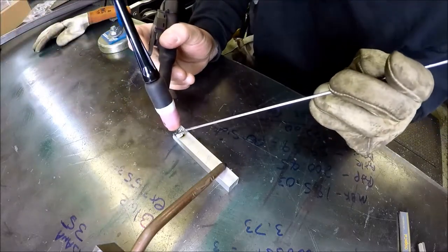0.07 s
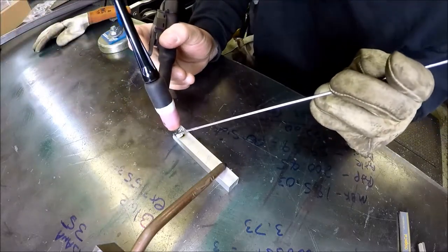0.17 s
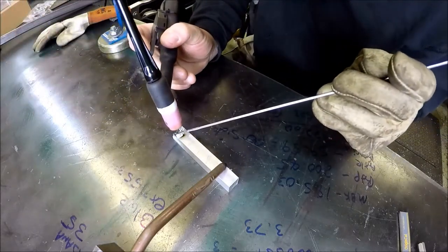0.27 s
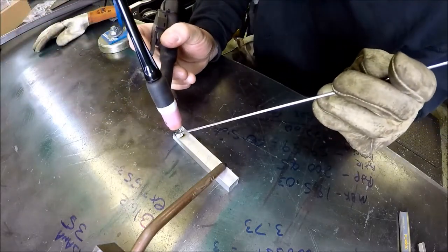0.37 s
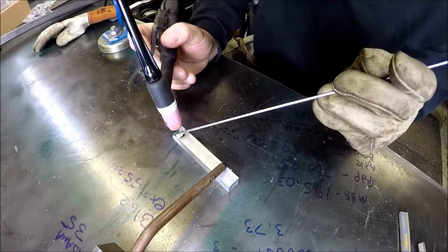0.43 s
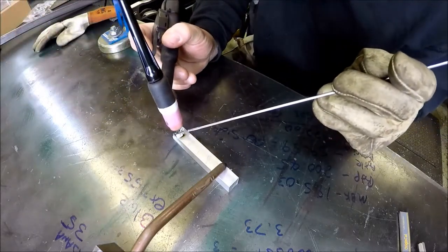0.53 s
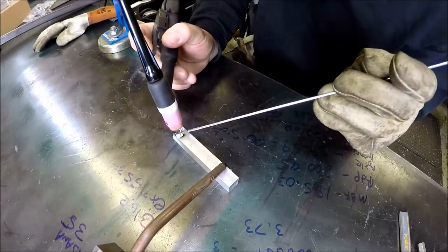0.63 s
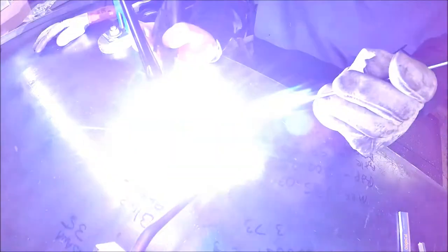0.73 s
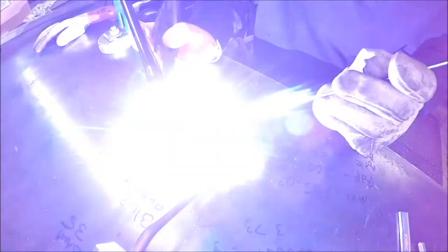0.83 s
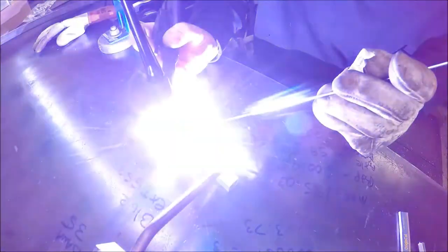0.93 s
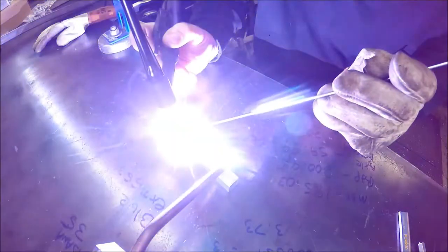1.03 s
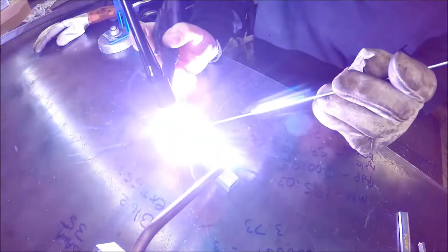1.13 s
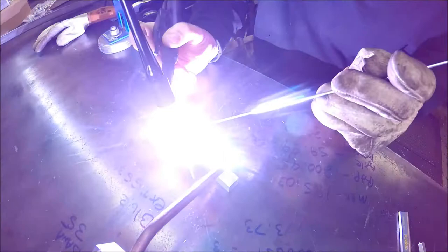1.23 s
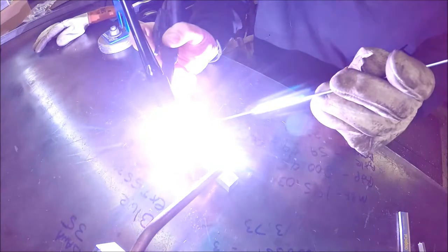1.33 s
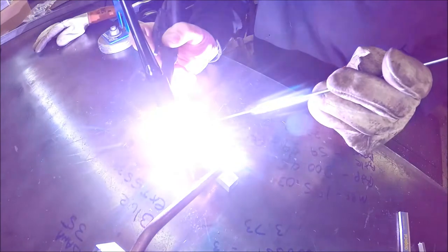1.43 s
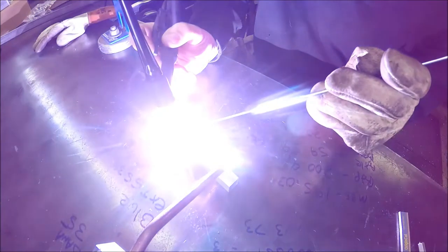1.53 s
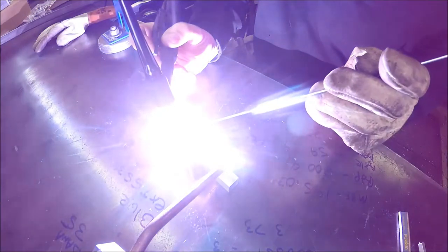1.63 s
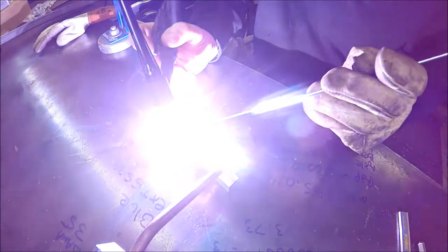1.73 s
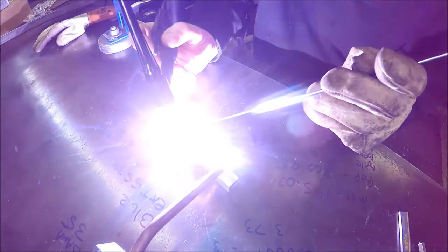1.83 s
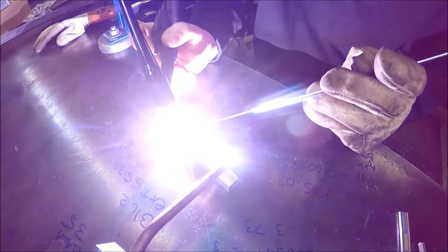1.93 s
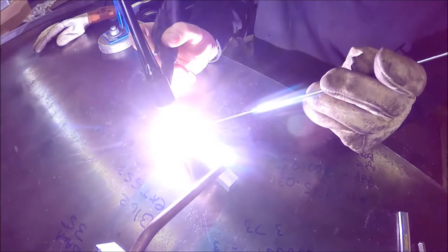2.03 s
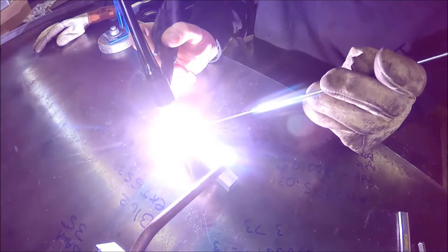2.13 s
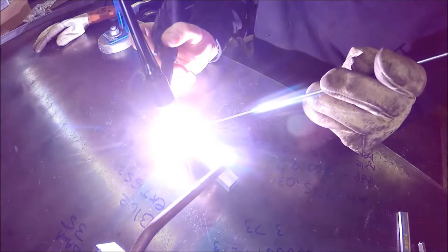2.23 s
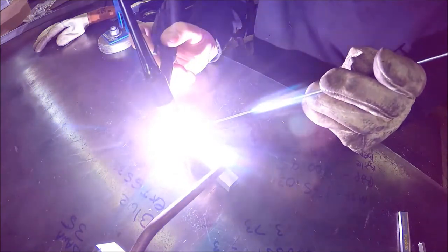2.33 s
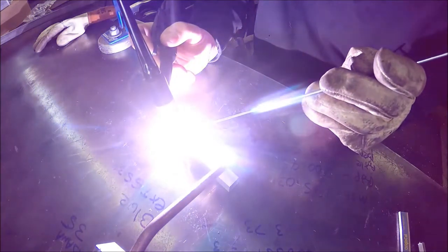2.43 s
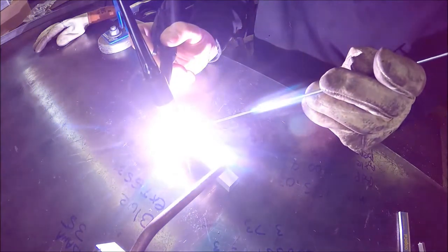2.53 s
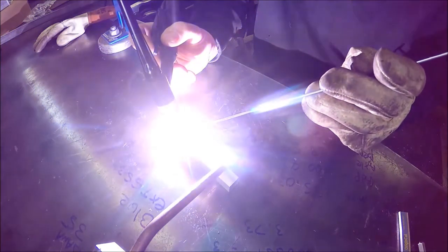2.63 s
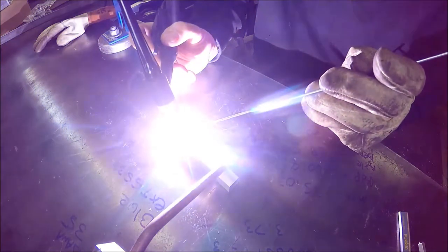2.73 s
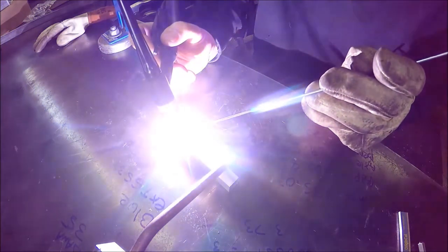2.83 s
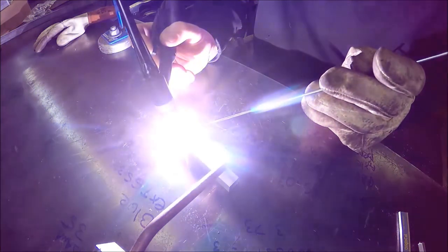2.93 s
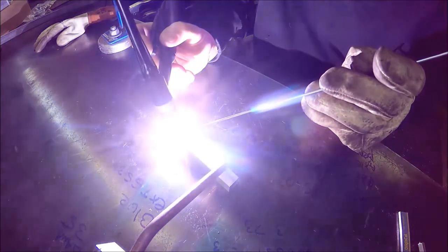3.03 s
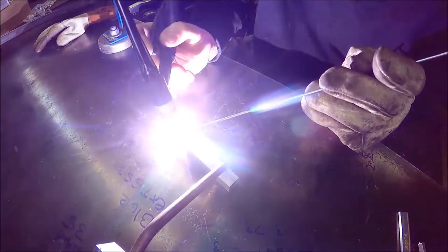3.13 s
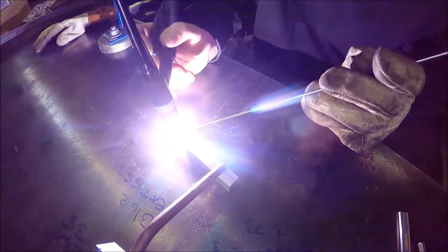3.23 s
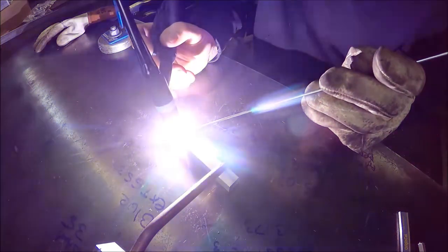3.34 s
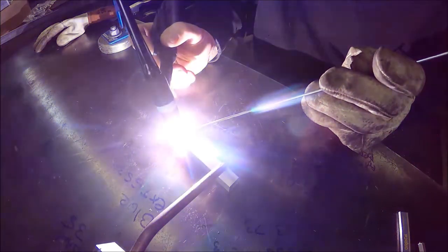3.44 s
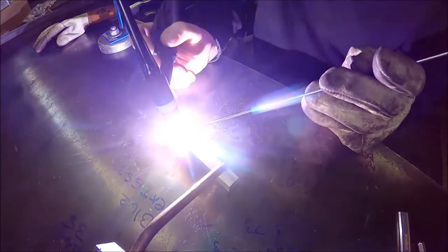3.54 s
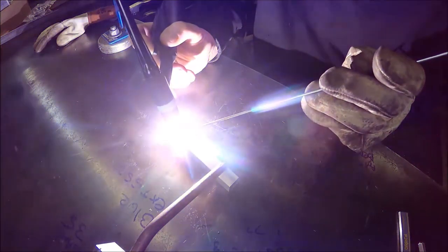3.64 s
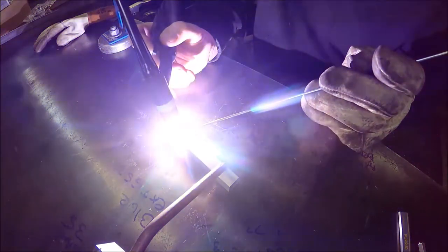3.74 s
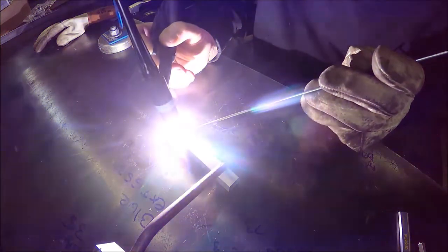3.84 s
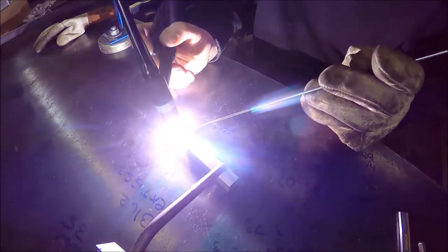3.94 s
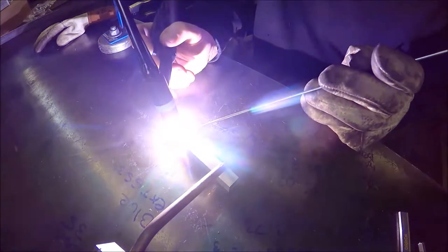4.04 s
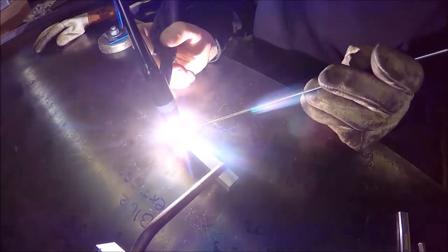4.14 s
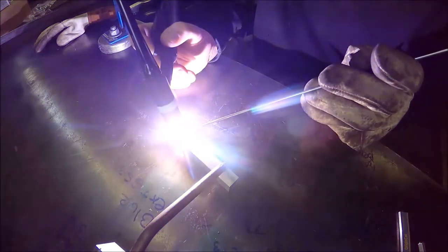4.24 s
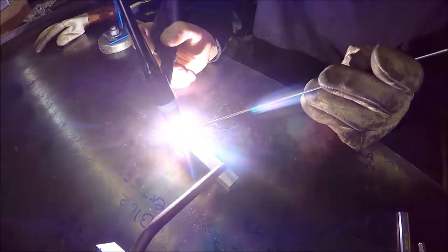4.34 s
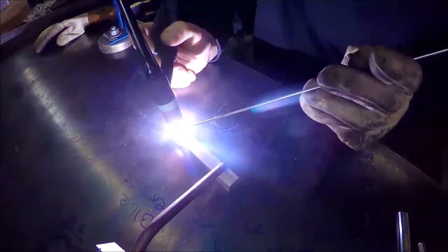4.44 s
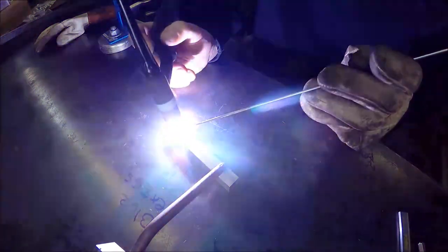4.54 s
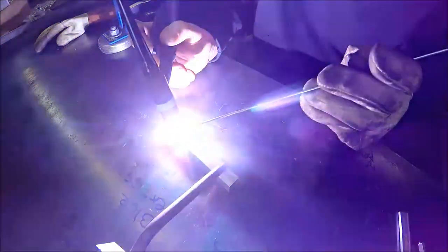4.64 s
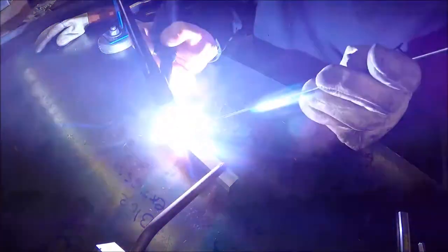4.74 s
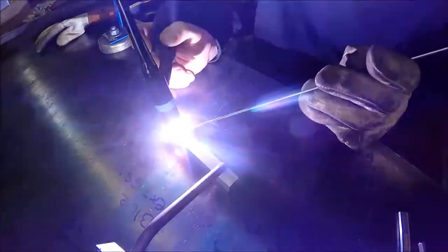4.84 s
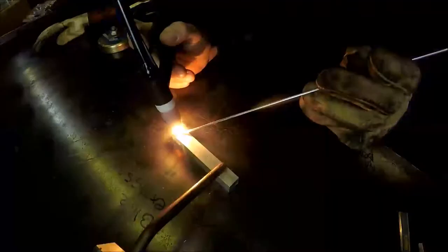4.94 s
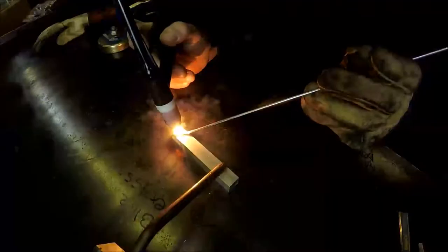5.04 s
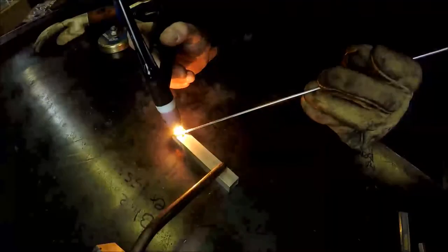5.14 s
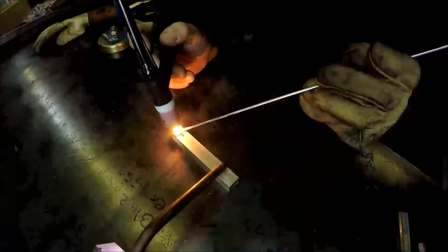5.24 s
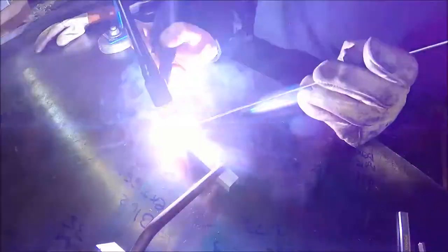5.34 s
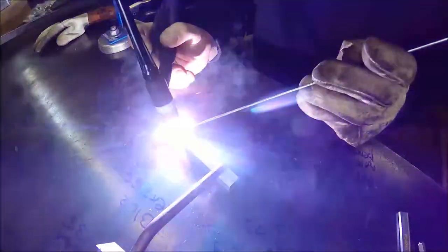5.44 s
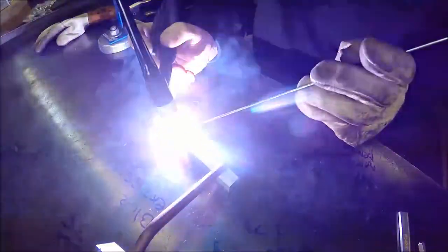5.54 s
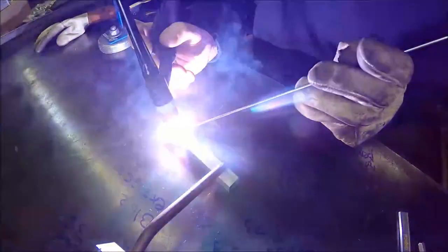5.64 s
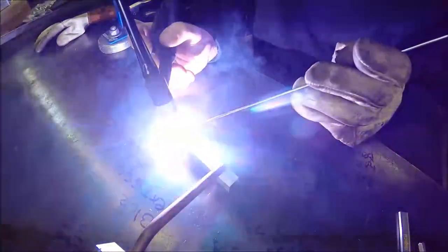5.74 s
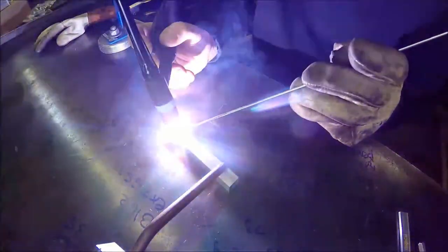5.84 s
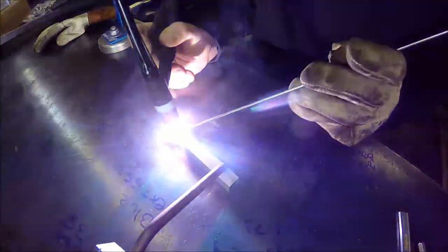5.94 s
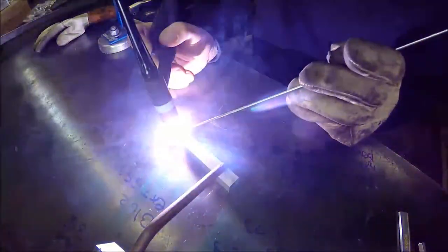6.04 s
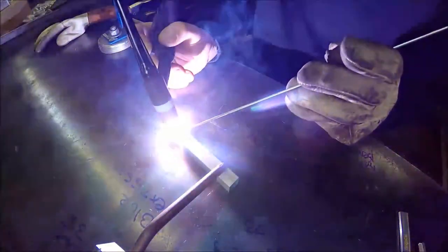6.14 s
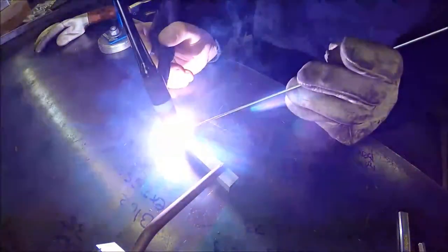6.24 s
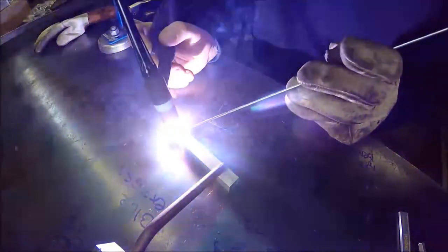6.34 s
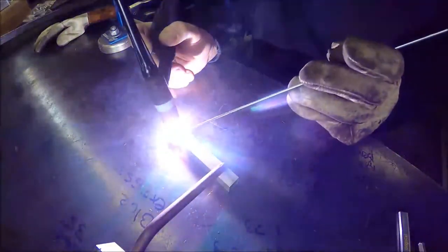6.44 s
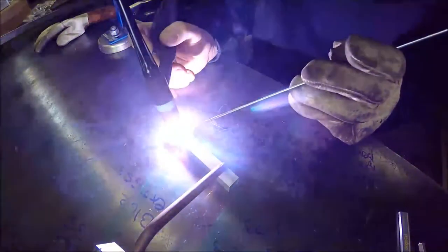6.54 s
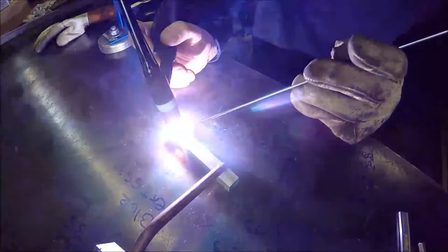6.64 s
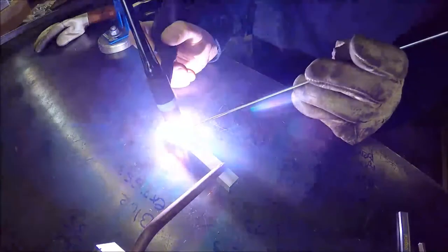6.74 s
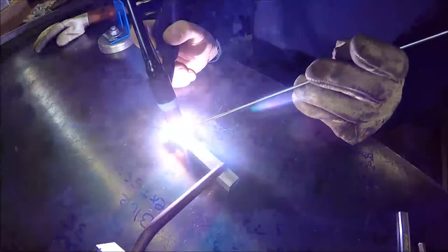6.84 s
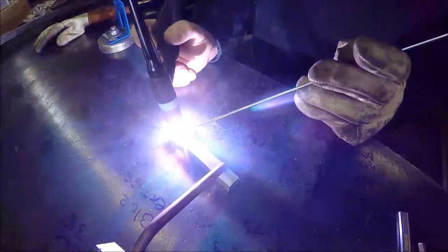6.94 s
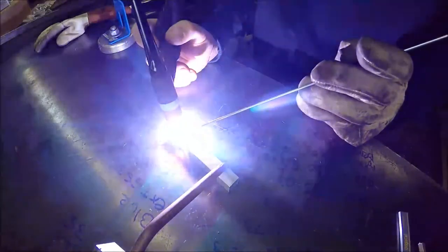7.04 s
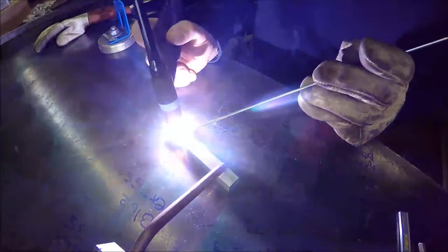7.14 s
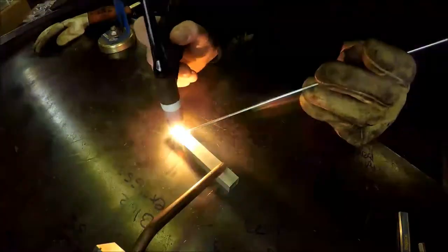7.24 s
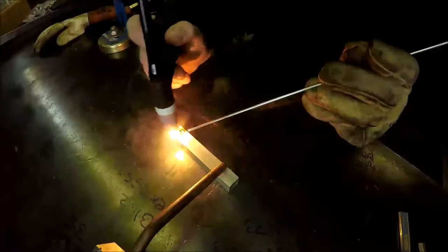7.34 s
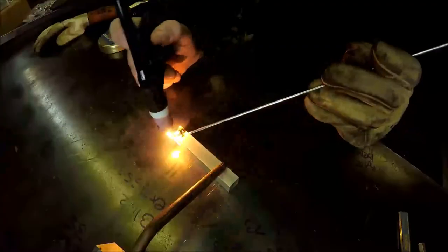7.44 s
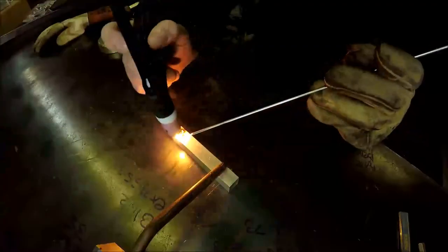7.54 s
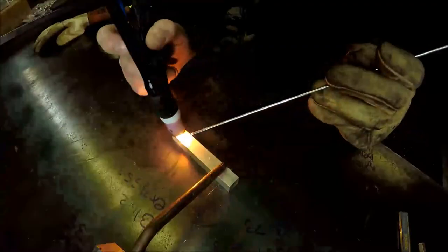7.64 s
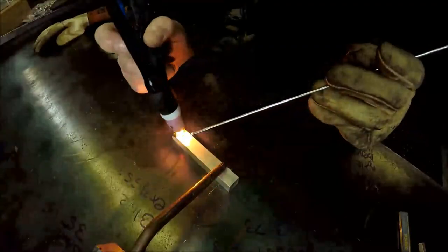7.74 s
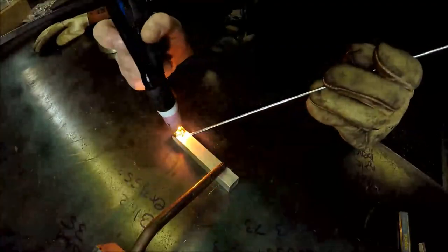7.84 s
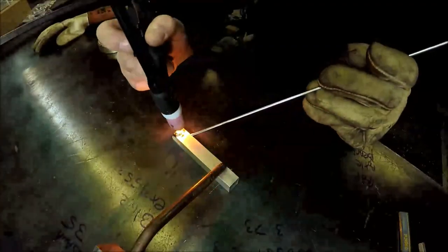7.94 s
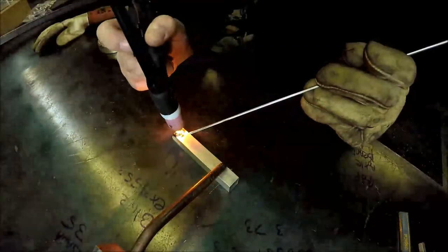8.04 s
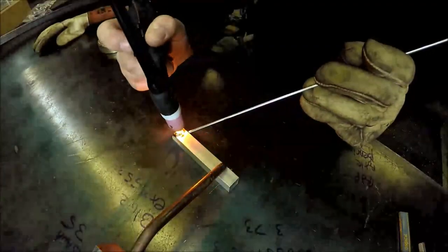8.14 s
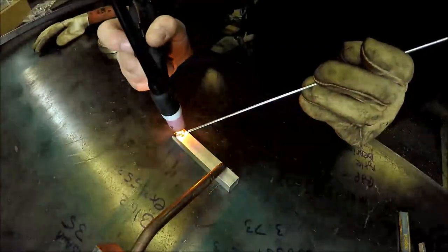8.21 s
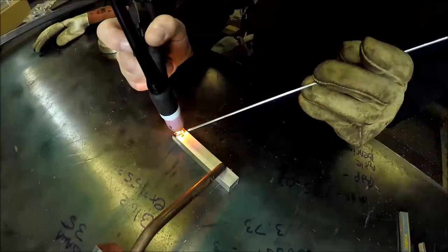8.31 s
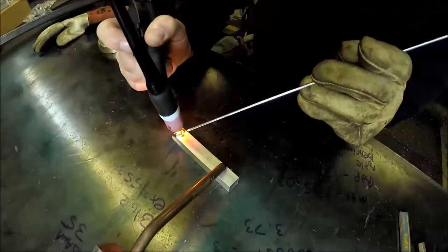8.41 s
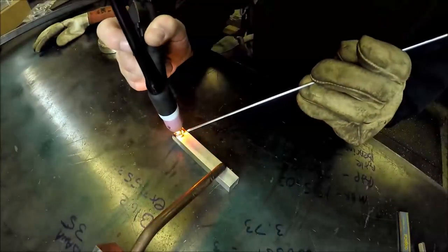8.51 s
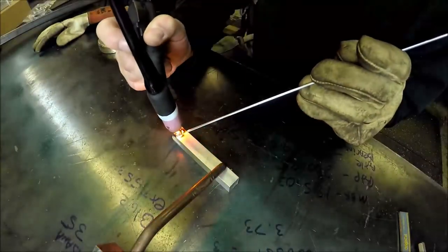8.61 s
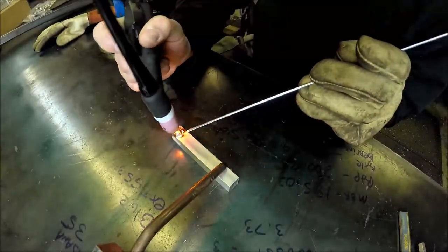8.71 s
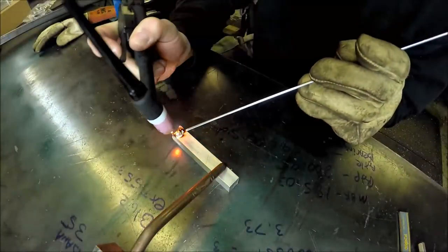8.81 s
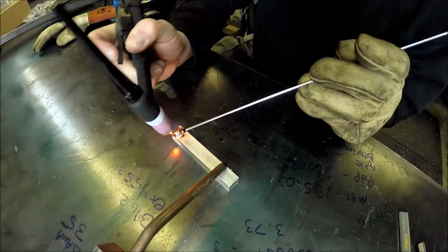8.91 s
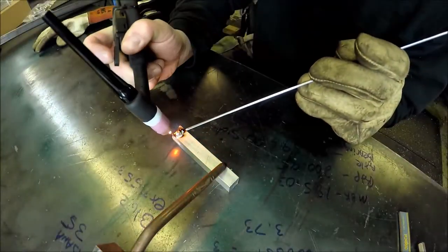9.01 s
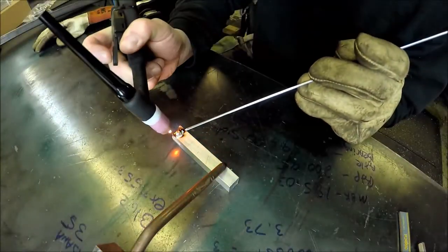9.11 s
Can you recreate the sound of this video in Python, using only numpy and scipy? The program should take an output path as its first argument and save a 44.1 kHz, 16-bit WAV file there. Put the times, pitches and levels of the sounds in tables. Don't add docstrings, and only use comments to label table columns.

```python
import sys
import numpy as np
from scipy import signal
from scipy.fft import rfft, irfft
from scipy.io import wavfile
from scipy.ndimage import uniform_filter1d

SR = 44100
rng = np.random.default_rng(int(sys.argv[2]) if len(sys.argv) > 2 else 0)


def magnitude_from_level(level_db):
    exponent = np.asarray(level_db, float) / 20
    return 10 ** exponent


def unload_wav(signal):
    wavfile.write(
        sys.argv[1],
        SR,
        np.round(np.clip(np.atleast_2d(signal).T, -1, 1) * 32767).astype(np.int16),
    )


N = 404397

# first reversal in seconds, end in seconds, current cycles per second.
BURNS = [
    (.81676, 5.04, 32.01042),
    (5.41011, 7.33, 32.01137),
]
POSITIVE_S = .01105


def evened(x):
    return x / np.sqrt(np.mean(x ** 2) + 1e-20)


def read(points, hz):
    f, value = np.transpose(points)
    return np.interp(np.log(hz + 1), np.log(f + 1), value)


def noise(points, treble_db=0., patchy_db=3.0, dip_hz=0., dip_db=0.):
    frames, hz = N // 128 + 5, np.fft.rfftfreq(512, 1 / SR)[:, None]
    a, b, patches = rng.standard_normal((frames, 257, 3)).T
    patches = uniform_filter1d(patches, size=4, axis=0)
    patches = evened(uniform_filter1d(patches, size=70, axis=1))
    frame_at = np.arange(frames) * 128
    treble, dip = (np.interp(frame_at, np.arange(N), c * np.ones(N)) for c in (treble_db, dip_hz))
    field_db = read(points, hz) + patchy_db * patches
    field_db += np.clip((hz - 8500) / 3500, 0, 1) * treble
    for share, depth in ((1, 1), (1.16, .6), (.81, .5)):
        field_db += depth * dip_db * np.exp(-.5 * ((hz - share * dip) / 400) ** 2)
    spectra = (a + 1j * b) * magnitude_from_level(field_db) * (hz < 15300)
    return evened(signal.istft(spectra, nperseg=512, noverlap=384)[1][:N])


def fan():
    # pitch in Hz, level in dB per Hz.
    air_colour = [(15, -46), (25, -14), (232, -5.5), (329, -8), (387, -11), (563, -13.5), (756, -11),
                  (1940, -16), (2530, -22), (4110, -25.5), (15300, -58)]
    # pitch in Hz, level in dB.
    hum = [(118.4, -54), (238, -54), (382.2, -48), (769.8, -60), (1152, -60), (1534, -65), (1916, -57)]
    t = np.arange(N) / SR
    hz = np.linspace(0, SR / 2, 2049)
    taps = signal.firwin2(4097, hz, magnitude_from_level(read(air_colour, hz)), fs=SR)
    air = signal.oaconvolve(rng.standard_normal(N), taps, "same")
    waver = evened(uniform_filter1d(rng.standard_normal((len(hum), N)), size=6000, axis=1))
    lines = np.zeros(N)
    for (pitch, db), w in zip(hum, waver):
        lines += magnitude_from_level(db + 4 + 1.6 * w) * np.sin(2 * np.pi * (pitch * t + w / 30))
    return magnitude_from_level(-41.5) * evened(air) + lines


def gas():
    # pitch in Hz, level in dB per Hz.
    gas_colour = [(760, -50), (1300, -16), (1670, -0.5), (2680, -7), (3390, -6), (4090, -10), (5860, -4.5),
                  (6500, 0.5), (8950, -9.5), (9720, -5.5), (11100, -15), (11600, -17), (13400, -11),
                  (15300, -16)]
    # time in seconds, hiss in dB, treble in dB as the cup turns, bench echo dip in Hz.
    flow = [(.755, -66, 2, 9300), (.77, -34, 0, 9000), (5.05, -45.5, 0, 11300), (5.35, -38.5, -1, 11300),
            (7.35, -50, -2, 10500), (7.45, -41.5, 3, 9000), (7.6, -41, 3, 9500), (7.7, -40.5, 7, 12500),
            (7.82, -39.5, 0, 11500), (7.9, -40, 5, 8750), (8.0, -39.5, 1, 8700), (8.07, -39.5, 2, 11400),
            (8.5, -39, 0, 11600), (8.8, -40, 2, 11400), (9.0, -40.5, 8, 11200), (9.17, -40.5, 5, 11100)]
    # time in seconds, peak in dB, pitch in Hz.
    valve = [
        (.62, -34, 9000),
        (.777, -34, 163),
    ]
    t = np.arange(N) / SR
    at, *curves = np.transpose(flow)
    flow_db, treble_db, dip_hz = (np.interp(t, at, c) for c in curves)
    out = magnitude_from_level(flow_db) * noise(gas_colour, treble_db, patchy_db=1.3, dip_hz=dip_hz, dip_db=-7.)
    (tick_s, tick_db, tick_hz), (puff_s, puff_db, puff_hz) = valve
    hiss = signal.lfilter(*signal.butter(1, tick_hz, "high", fs=SR), rng.standard_normal(N))
    out += magnitude_from_level(tick_db) * hiss * np.exp(-.5 * ((t - tick_s) / 0.0009) ** 2)
    puff = np.sin(2 * np.pi * puff_hz * t) * np.exp(-.5 * ((t - puff_s) / 0.0061) ** 2)
    return out + magnitude_from_level(puff_db) * puff


def controls(s):
    # time in seconds, current in dB, pool size in dB, arc length in dB.
    pedal = [(.83, -1, -0.5, 4), (.95, 2, -1.5, 6), (1.15, -3.5, -7, 1), (1.4, -0.5, -0.5, 1.5),
             (1.9, 0.5, 1, 3), (2.6, 1, 2, 3), (3.299, 1.5, 2, 1), (3.9, 1.5, 0, 2), (4.3, -1, -2, -0.5),
             (4.72, -1, -0.5, -1.5), (5.0, -4, -6.5, 1), (5.42, 0.5, -1.5, 0.5), (5.7, -5.5, -5.5, 3),
             (5.85, -4.5, -8.5, -4), (6.1, -3.5, -4.5, -0.5), (6.5, -1, -3, 3), (7.02, -2.5, -1.5, -1),
             (7.3, -3, -3.5, 1.5)]
    # time in seconds, spread in seconds, flare in dB.
    flares = [
        (.92, 0.064, 3),
        (4.56, 0.047, 5.5),
        (4.7, .07, 6),
        (5.42, 0.026, 2),
        (5.6, .012, 5.5),
        (5.69, 0.043, 7),
        (6.5, 0.12, 1.5),
        (7.28, 0.05, 3.5),
    ]
    at, current, pool, length = np.transpose(pedal)
    flare = np.max([db * np.exp(-.5 * ((s - mid) / spread) ** 4) for mid, spread, db in flares], axis=0)
    return np.array([np.interp(s, at, current), np.interp(s, at, pool), flare, np.interp(s, at, length)])


def arc_treble(s):
    return -5 - 0.4 * s


def push(s):
    current, pool, flare, length = controls(s)
    fed = s > 4.45
    calm_db = 1.2 * np.minimum(pool, 0) * (s < 4.45)
    return -16.5 + 7.5 * fed + calm_db + 0.21 * flare


def reversals():
    # time in seconds, snap in dB, thump in dB, knock in dB.
    strays = [
        (0.7891, -17, -20, -20),
        (0.8012, -19, -13.5, -9),
        (4.4959, -9, -17, -15),
        (4.5093, -14, -22, -22),
        (4.5682, -38, -19, -20),
        (5.039, -35.7, -23, -25),
        (5.3725, -21, -19, -18),
        (5.3902, -14.5, -21, -11.5),
        (5.606, -28.5, -25, -25),
        (5.6975, -30, -41, -25),
    ]
    # dB at full current, then dB per dB of current,
    # of pool, of flare and of arc length.
    to_plus = [(-16, 0, 0.036, 0.094, 0.63), (-21.5, -0.35, 0.81, .9, .1), (-26, -0.5, 1.2, 0.99, 0)]
    to_minus = [(-16.5, 0.64, 0, 0.041, .2), (-23, 1.7, 0.11, 0.62, 0), (-14.5, 0.98, 0.013, 0.45, 0)]
    t = np.arange(N) / SR
    rows, gates = [(*row, 0) for row in strays], np.zeros((2, N))
    for start, end, rate in BURNS:
        for law, late, positive in ((to_plus, 0, 1), (to_minus, POSITIVE_S, 0)):
            at, law = np.arange(start + late, end, 1 / rate), np.array(law)
            levels_db = law[:, :1] + law[:, 1:] @ controls(at)
            rows += list(zip(at, *levels_db, positive + 0 * at))
        burning = (t > start - .028) & (t < end)
        gates += [burning & ((t - start) * rate % 1 < POSITIVE_S * rate), burning]
    return np.array(rows), gates


def burst(hz, centre_s, spread_s):
    t = np.arange(1024) / SR - centre_s
    x = np.cos(2 * np.pi * hz * t) * np.exp(-.5 * (t / spread_s) ** 2)
    return rfft(x / np.linalg.norm(x, axis=-1, keepdims=True)) * np.sqrt(.003 * SR)


def snap_colour(hz):
    # pitch in Hz, level in dB.
    snap_points = [(1700, -42.5), (2350, 4), (3000, -9), (4600, -9), (5550, -4), (5850, 1), (7500, 4.5),
                   (8800, -2), (10200, 4), (11300, -6.5), (12700, -5.5), (14200, -3.5), (15300, -7),
                   (16500, -30)]
    # delay in seconds, level in dB.
    echoes = [(.00034, -13), (.00082, -15), (.00143, -16), (.00197, -16), (.0024, -22)]
    snap_db = read(snap_points, hz)
    log_gain = np.log(magnitude_from_level(np.r_[snap_db, snap_db[-2:0:-1]]))
    snap = 1j * np.exp(np.conj(signal.hilbert(log_gain)))[:len(hz)]
    scatter = 1
    for k, (s, db) in enumerate(echoes):
        scatter = scatter + (-1) ** k * magnitude_from_level(db) * np.exp(-2j * np.pi * hz * s)
    snap *= scatter
    return snap * np.sqrt(.003 * SR / np.mean(abs(snap) ** 2))


def cracks(rows):
    # pitch in Hz, level in dB.
    ringing = [(2593, -33), (2960, -25.5), (3470, -37.5), (5790, -36)]
    hz, t, lead = np.fft.rfftfreq(1024, 1 / SR), np.arange(1024) / SR, 128 / SR
    s, db, positive = rows[:, 0], rows[:, 1:4], rows[:, 4:]
    chance = rng.standard_normal((len(rows), 7))
    vary_db = (.25 + .55 * positive) * chance[:, :3] * [.8, 1.2, 1.1]
    size = magnitude_from_level(db + np.array([-1., -1.2, -.8]) + vary_db)
    snap_size, thump_size, knock_size = size.T[:, :, None]
    treble_db = arc_treble(s)[:, None] + 6
    unrest = thump_size * magnitude_from_level(push(s))[:, None]
    spit = rng.standard_normal((len(rows), 1024)) * np.exp(-t / .0002)
    spit = rfft(spit / np.linalg.norm(spit, axis=1, keepdims=True))
    snap = snap_colour(hz) * (.97 + .18 * spit)
    held = np.clip(t / 0.0023, 0, 1) * np.clip((.0095 - t) / 0.000079, 0, 1)
    whine = rfft(held * sum(magnitude_from_level(level) * np.sin(2 * np.pi * f * t) for f, level in ringing))
    z = snap * magnitude_from_level(treble_db * np.clip((hz - 10500) / 1000, 0, 1))
    z = z + (2 * positive - 1) * whine * magnitude_from_level(11)
    z *= snap_size * np.exp(-2j * np.pi * hz * (lead - .0001))
    z -= thump_size * burst(704, lead + 0.00033 + 0.00018 * positive, 0.00073)
    z += unrest * burst(258, lead + 0.002, 0.0012)
    z -= thump_size * magnitude_from_level(-10.0) * burst(619, lead + 0.005236 + 0.000072 * positive, 0.0025)
    z -= thump_size * magnitude_from_level(-14.0) * burst(470, lead + 0.00441, 0.0027)
    z += knock_size * magnitude_from_level(-10.0) * burst(2162, lead + 0.00052, 0.0016)
    z += knock_size * magnitude_from_level(-17.0) * burst(1720, lead + 0.0076, 0.0056)
    z += knock_size * (1 - 2 * positive) * burst(1754, lead + .0001 + 0.00045 * positive, 0.00064)
    pop_hz = 2100 * np.exp(0.26 * chance[:, 4:5])
    pop = burst(pop_hz, lead + 0.000637 + 0.00022 * chance[:, 5:6], 0.00017)
    z += magnitude_from_level(-1.) * unrest * positive * np.tanh(chance[:, 6:]) * pop
    splinter = burst(3500, lead + 0.00042, 0.00018)
    z += knock_size * positive * unrest / thump_size * magnitude_from_level(1.5) * splinter
    place = (s - lead) * SR + 0.045 * chance[:, 3]
    z *= np.exp(-2j * np.pi * hz * (place[:, None] % 1) / SR)
    out = np.zeros(N)
    np.add.at(out, place.astype(int)[:, None] + np.arange(1024), irfft(z))
    return out


def sizzle(gates):
    # pitch in Hz, level in dB per Hz.
    sizzle_colour = [(60, -6.5), (150, -4.2), (300, -1.4), (600, 0.0), (1150, -11), (1800, -0.9),
                     (2900, -6.7), (4500, -15), (5800, -7.8), (7500, -5.3), (10000, -5.7), (12700, -10.6),
                     (14500, -6.8), (15300, -10.6)]
    roar_colour = [(60, -5.3), (150, -2.2), (300, 0.0), (600, -0.9), (1150, -12), (1800, -2.9),
                   (2900, -11.4), (4500, -19), (5800, -13.3), (7500, -14.3), (10000, -15.4), (12700, -19.3),
                   (14500, -17.4), (15300, -19.1)]
    t = np.arange(N) / SR
    current, pool, flare, length = controls(t)
    positive, burning = uniform_filter1d(gates, size=40, axis=1)
    spots = magnitude_from_level(2.5 * evened(uniform_filter1d(rng.standard_normal(N), size=30)))
    fizz = evened(spots * noise(sizzle_colour, arc_treble(t) + 1.8))
    fizz_db = -29 + 0.27 * current + 0.42 * flare
    roar_db = -39.25 + 0.18 * current + 12.5 * np.exp(-abs(t - BURNS[0][0]) / 0.69)
    high = signal.butter(6, 5700, "high", fs=SR, output="sos")
    bright = evened(signal.sosfilt(high, fizz))
    skin = magnitude_from_level(-22.5) * np.exp(-.5 * ((t - 1.29) / 0.21) ** 2)
    return positive * (magnitude_from_level(fizz_db) * fizz + skin * bright) + magnitude_from_level(roar_db) * burning * noise(roar_colour)


def shop(x):
    # delay in seconds, level in dB.
    bench = [(.00524, -50), (.00718, -21), (.0083, -29)]
    # pitch in Hz, level in dB.
    walls = [(100, 7.5), (450, 2.5), (640, 10), (900, -12), (1150, 2), (1500, 5.5), (1900, 1), (2300, 3.5),
             (3500, 8.5), (4500, 9.5), (5300, 9.5), (6000, 1.5), (10000, -0.5), (16000, -7)]
    taps = np.zeros(SR // 2)
    at = np.arange(140, len(taps) - 20, 20)
    taps[at + rng.integers(0, 20, len(at))] = rng.choice([-1., 1.], len(at))
    taps *= magnitude_from_level(-35 - 60 * np.arange(len(taps)) / SR / .28)
    for delay, db in bench:
        taps[round(delay * SR)] += magnitude_from_level(db)
    taps = irfft(rfft(taps) * magnitude_from_level(read(walls, np.fft.rfftfreq(len(taps), 1 / SR))))
    return x + signal.oaconvolve(x, taps)[:N]


def scene():
    rows, gates = reversals()
    arc = shop(cracks(rows)) + sizzle(gates)
    return (magnitude_from_level(9.0) * arc + fan() + gas())[None]


def low_pass(x):
    return signal.sosfilt(signal.butter(12, 16640, fs=SR, output="sos"), x)


def record(dry):
    power_db = 10 * np.log10(abs(uniform_filter1d(dry[0] ** 2, size=200, origin=99)) + 1e-12)
    fall = np.arange(N) * 12.0 / SR
    over_db = np.clip(power_db + 32, 0, 8.5)
    over_db = np.maximum.accumulate(over_db + fall) - fall
    ducked = dry / magnitude_from_level(uniform_filter1d(over_db, size=400))
    limited = np.tanh(ducked / 1.357) * 1.188
    edge = signal.firwin2(511, [0, 16400, 16650, SR / 2], [1, 1, 0, 0], fs=SR)
    return low_pass(signal.oaconvolve(limited, edge[None], "same"))


dry = scene()
out = record(dry)
unload_wav(out)
```